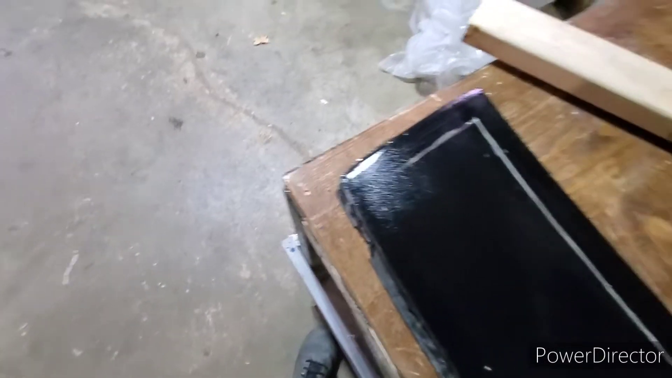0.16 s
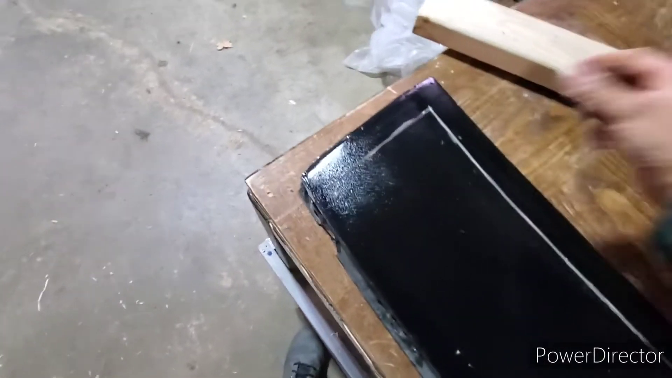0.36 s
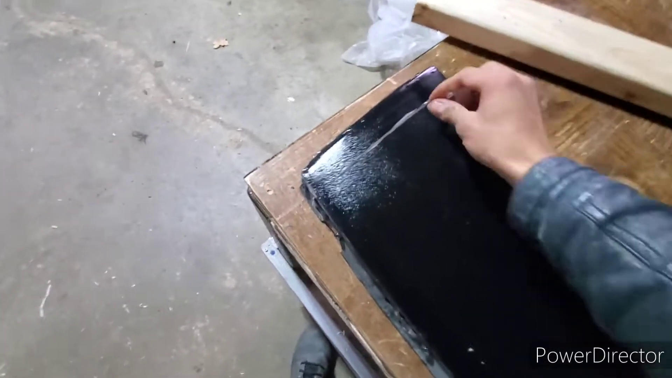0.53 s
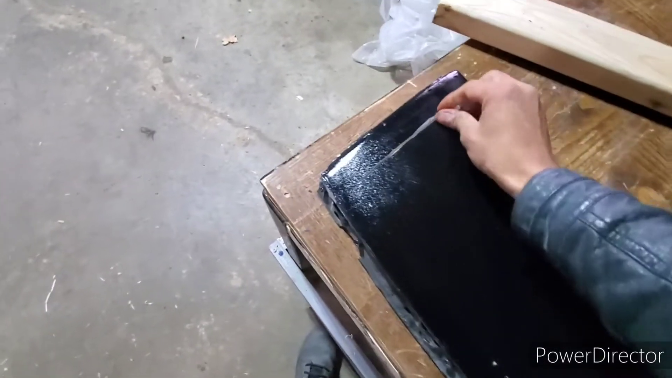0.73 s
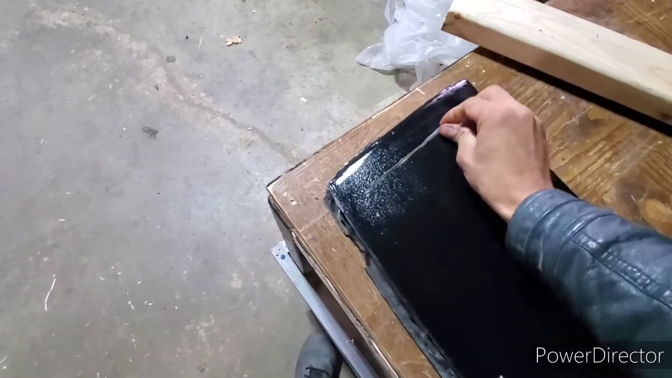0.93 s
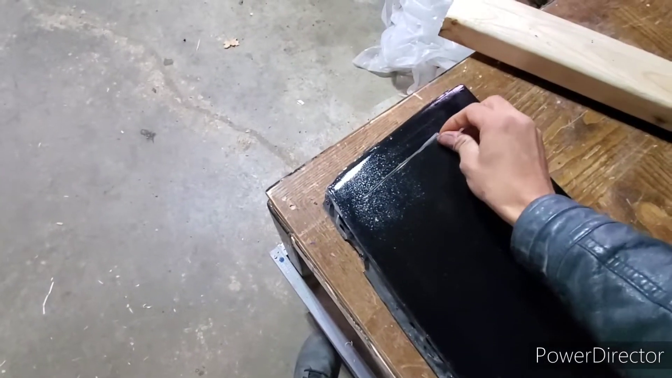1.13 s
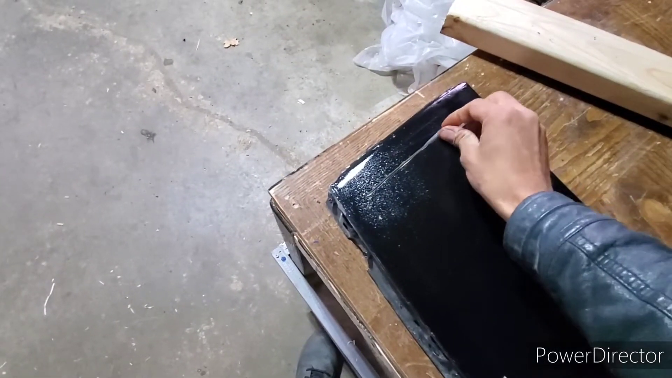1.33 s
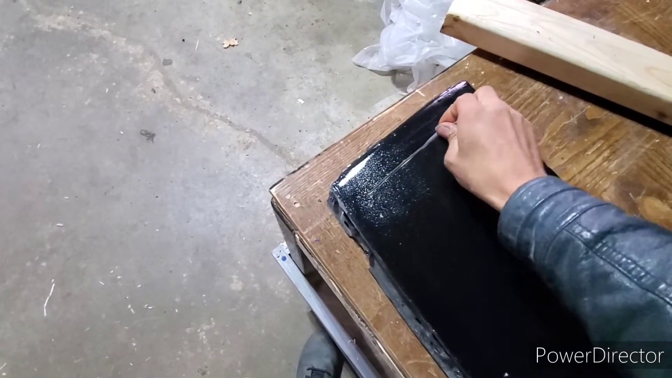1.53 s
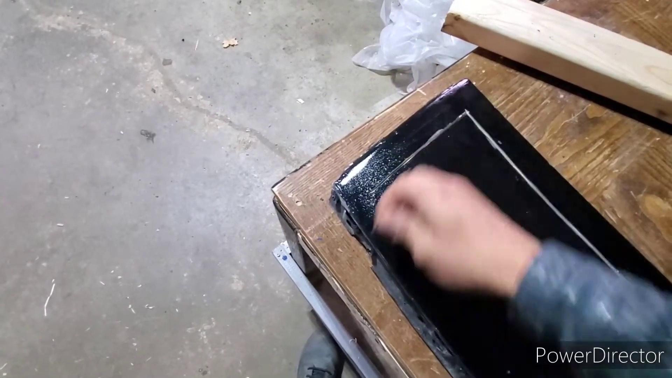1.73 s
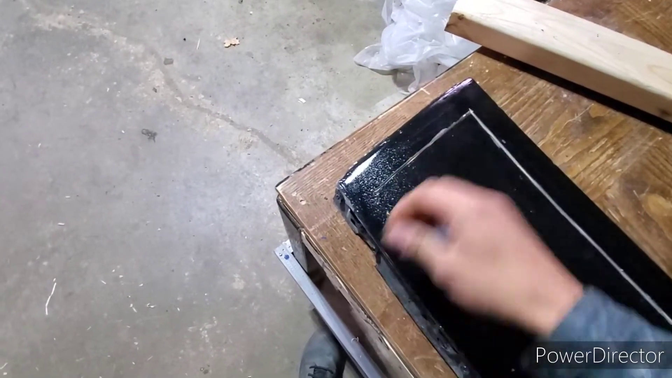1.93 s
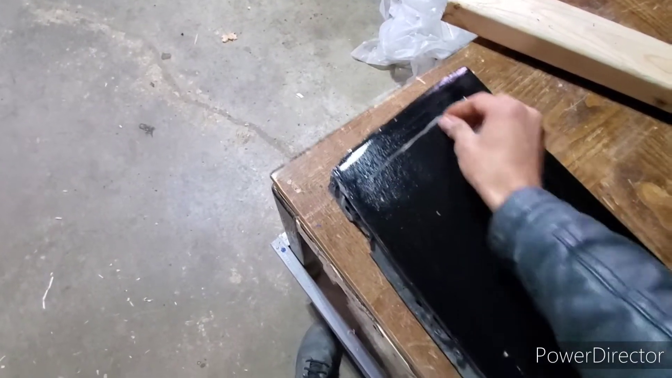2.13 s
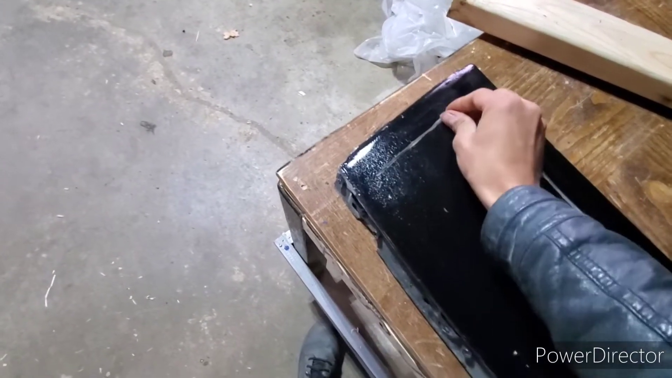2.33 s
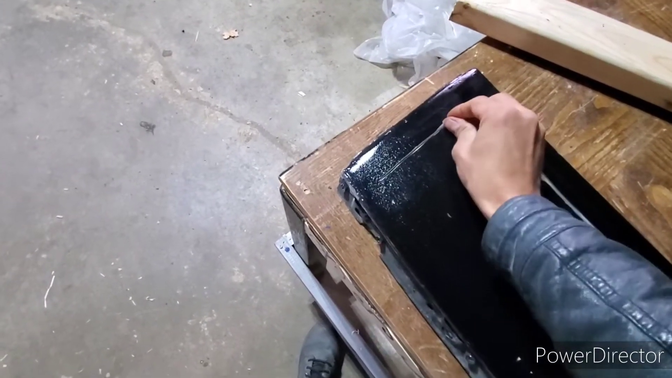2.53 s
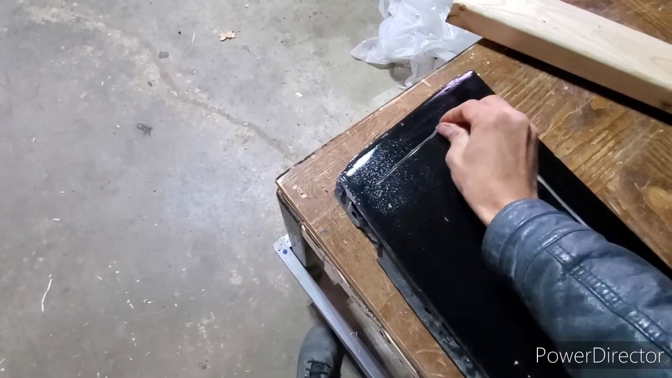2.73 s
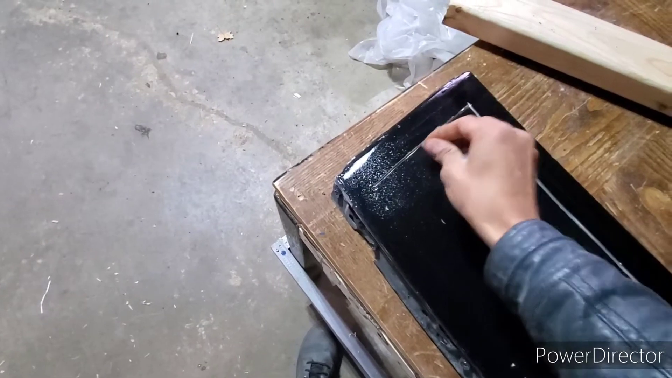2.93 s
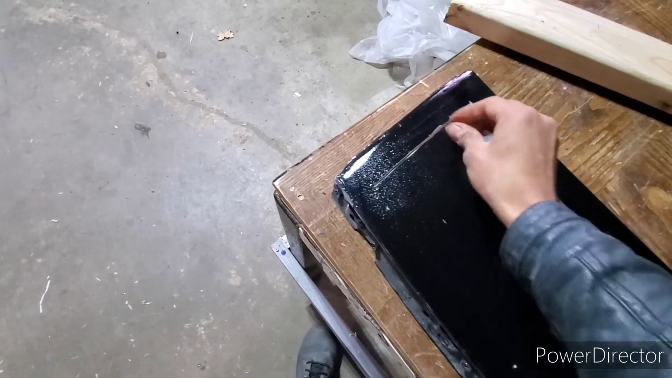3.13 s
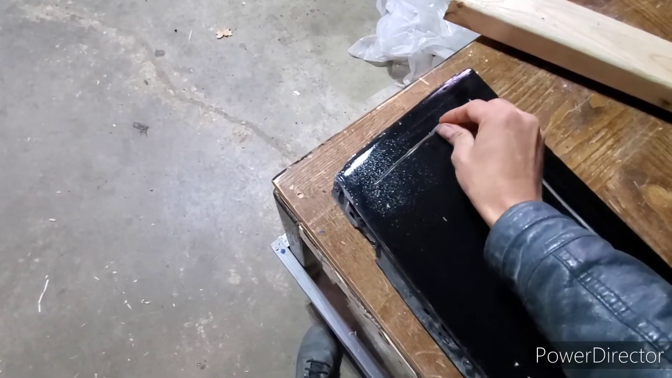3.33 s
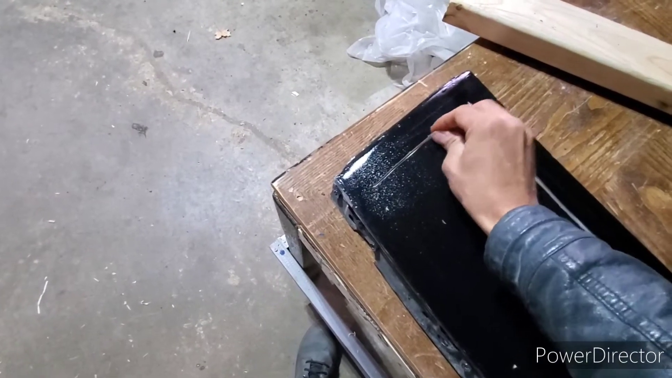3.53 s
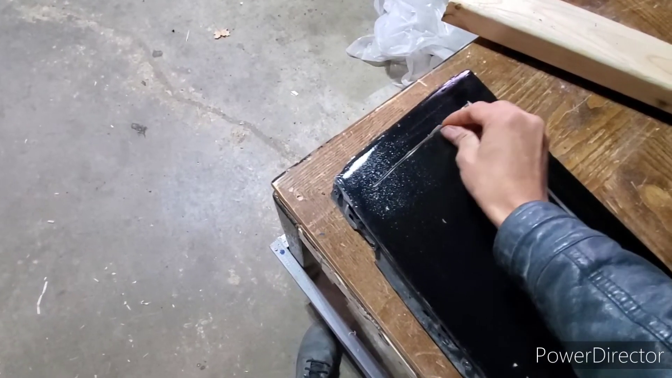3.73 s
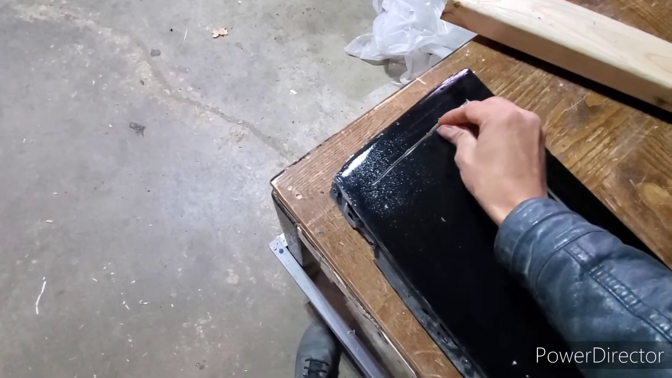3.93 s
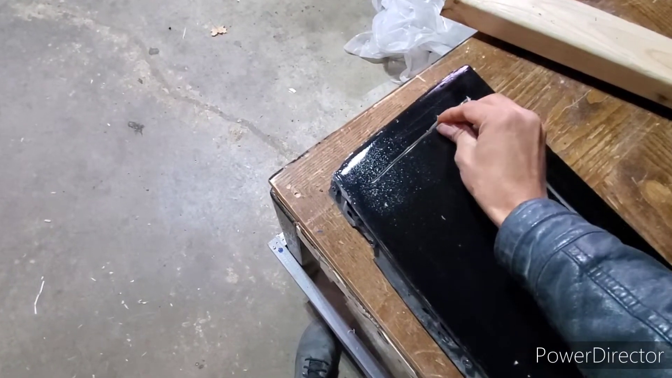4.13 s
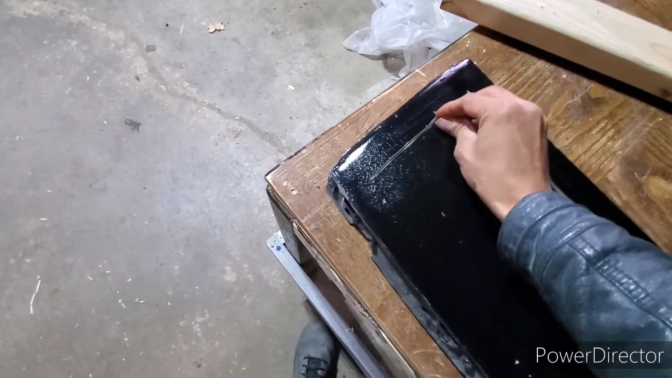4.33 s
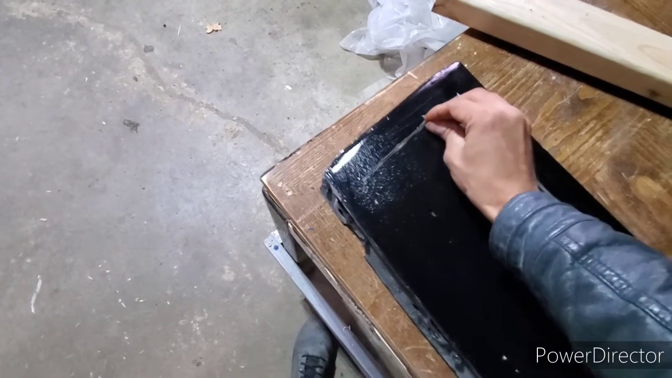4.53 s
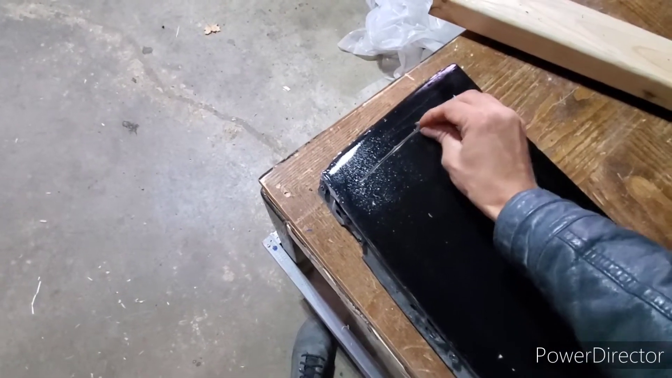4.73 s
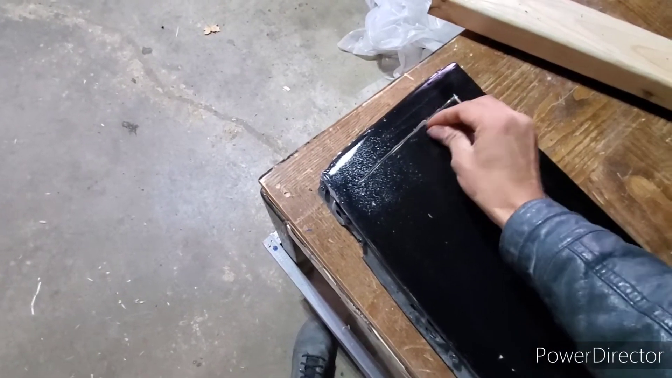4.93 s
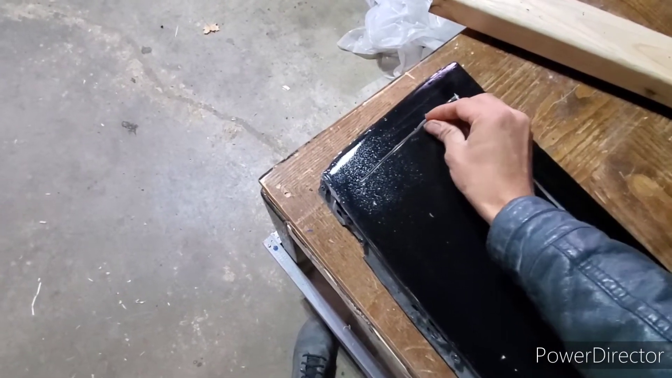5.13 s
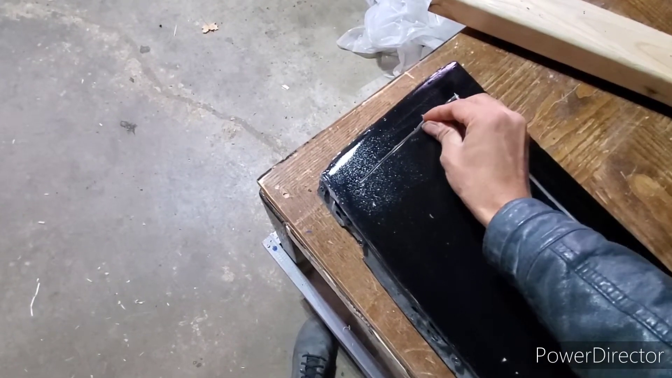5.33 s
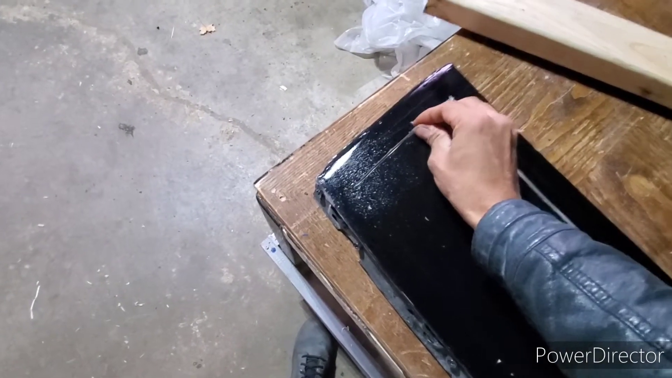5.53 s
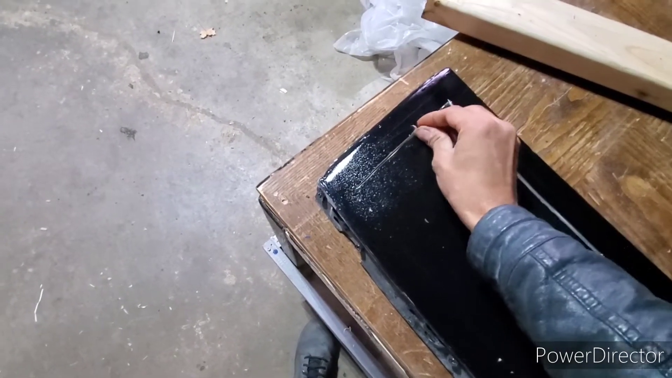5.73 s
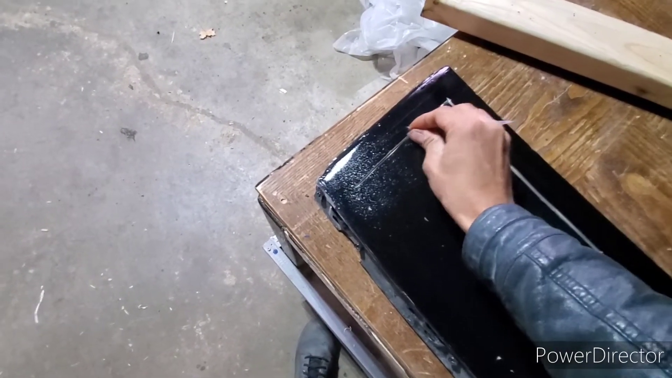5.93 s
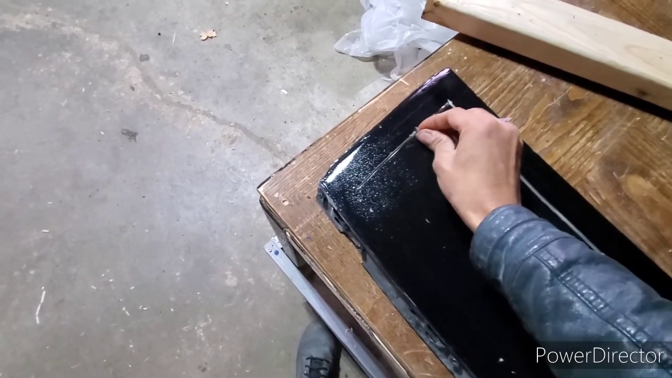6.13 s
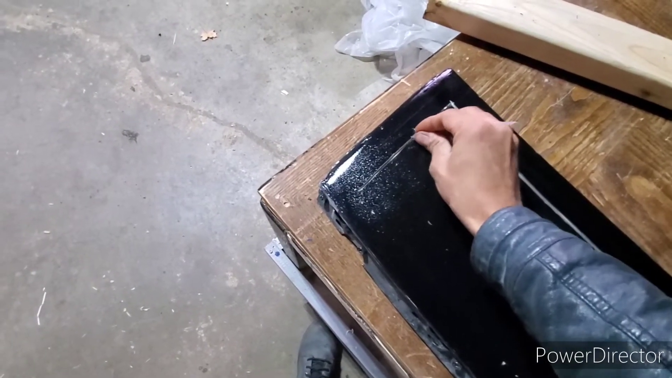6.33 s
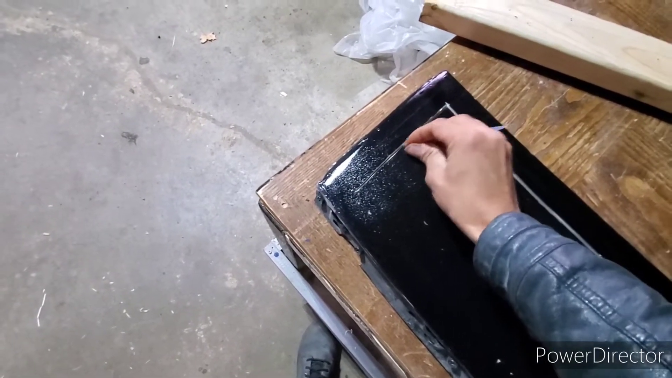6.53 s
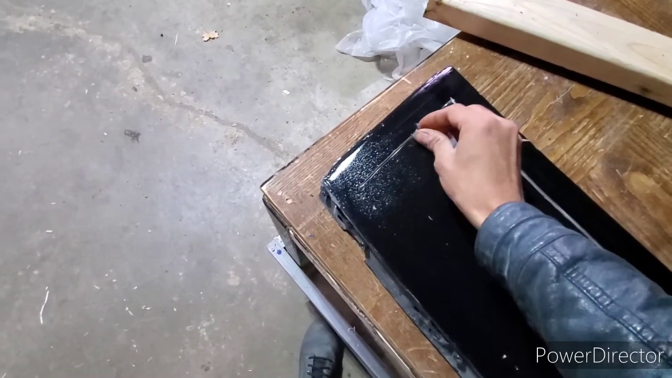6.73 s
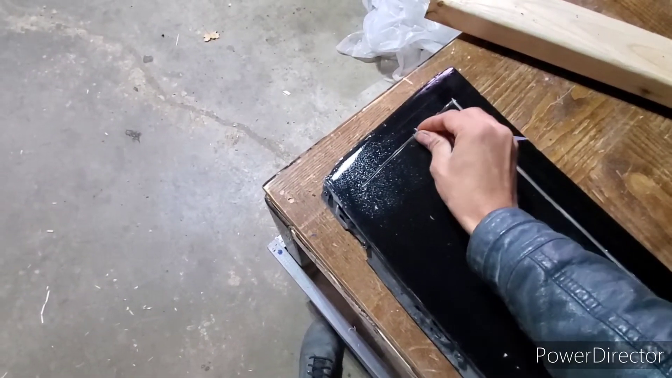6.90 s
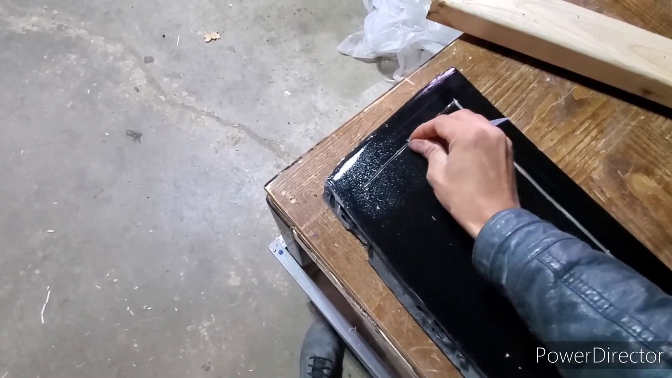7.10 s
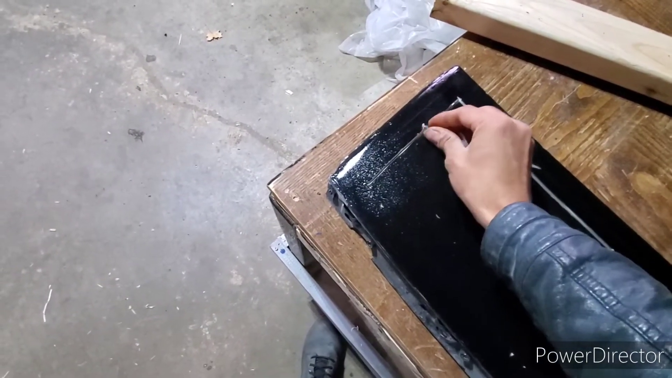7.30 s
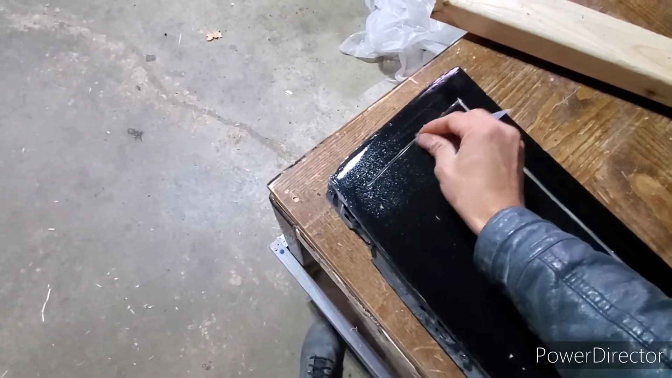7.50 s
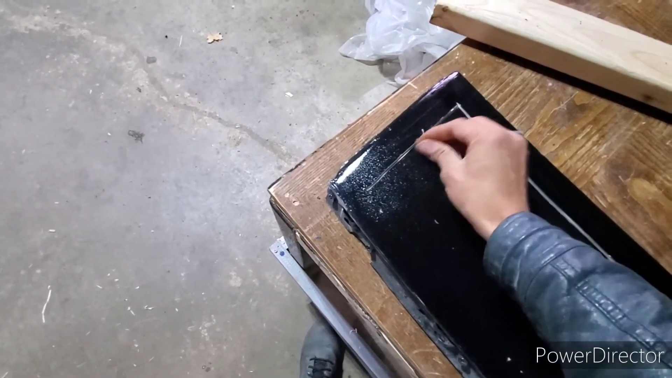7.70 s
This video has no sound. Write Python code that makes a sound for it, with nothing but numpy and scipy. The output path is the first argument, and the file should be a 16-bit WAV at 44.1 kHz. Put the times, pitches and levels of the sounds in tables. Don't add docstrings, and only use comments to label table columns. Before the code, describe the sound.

Fingernails knock and scrape on a hollow plastic panel while stuck tape lets go in sharp ticks, cracks and short crackling rips, inside a bare garage.

```python
import sys
import numpy as np
from scipy import signal
from scipy.fft import rfft, irfft
from scipy.io import wavfile
from scipy.ndimage import uniform_filter1d

SR = 44100
rng = np.random.default_rng(int(sys.argv[2]) if len(sys.argv) > 2 else 0)


def ratio_of_db(decibels):
    return 10 ** (np.asarray(decibels, float) / 20)


def transcribe(u):
    v = np.clip(np.atleast_2d(u).T, -1, 1)
    q = np.round(v * 32767).astype(np.int16)
    wavfile.write(sys.argv[1], SR, q)


N = 342216
T = np.arange(N) / SR
SIDES = np.array([[1], [-1]])


def unit(x):
    return x / np.sqrt(np.mean(x ** 2))


def even(x, span_s):
    return x / np.sqrt(uniform_filter1d(x ** 2, int(span_s * SR)) + 1e-12)


def band(x, lo_hz, hi_hz):
    sos = signal.butter(2, [lo_hz, min(hi_hz, .45 * SR)], "band", fs=SR, output="sos")
    return signal.sosfilt(sos, x)


def decay(t, t60_s):
    return np.exp(-np.log(1000) * t / t60_s)


def on_log(hz, table, column):
    rows = np.array(table)
    return np.interp(np.log(np.maximum(hz, 1)), np.log(rows[:, 0]), rows[:, column])


def over_time(table):
    return np.interp(T, *np.transpose(table))


def add(out, s, y):
    i = int(s * SR)
    out[..., i:i + y.shape[-1]] += y[..., :N - i]


def pair(count, like):
    mid, side = rng.standard_normal((2, count))
    return np.sqrt(like) * mid + np.sqrt(1 - like) * side * SIDES


def pan(db):
    return ratio_of_db(SIDES / 2 * db)


def slips(per_s, spread_db):
    when = rng.random(N) < per_s / SR
    size = ratio_of_db(spread_db * rng.exponential(size=N))
    return unit(when * size * rng.choice([-1, 1], N))


def ring(modes, detune, scatter_db, spot_hz=0, fall_db=0):
    hz, db, t60_s = np.transpose(modes)[:, :, None]
    luck = rng.standard_normal((3, len(modes), 1))
    t = T[:SR // 4]
    if spot_hz:
        db = db - fall_db * np.abs(np.log2(hz / spot_hz))
    turns = hz * (1 + detune * luck[1]) * t + 0.16 * luck[2]
    level = ratio_of_db(db + scatter_db * luck[0])
    y = np.sum(level * decay(t, t60_s) * np.sin(2 * np.pi * turns), axis=0)
    y = y * (1 - np.exp(-t * hz.mean() / 0.094)) ** 2
    return y / np.abs(y).max()


# frequency in Hz, density in dB per Hz.
AIR = [(18, -33), (30, -19), (95, 2), (239, 13), (461, -7), (844, -41), (1160, -22), (2120, -15),
       (3770, -1.5), (5900, -46), (7670, -19), (14800, -49), (16000, -48.5)]
AIR_DB = -33.5
# time in seconds, level in dB.
GRIP = [(0.0, -46), (1.55, -36), (1.69, -28.5), (2.14, -36), (2.4, -29.5), (2.59, -37.5), (3.05, -33.5),
        (3.5, -39), (3.95, -27.5), (4.08, -40), (5.25, -36), (5.79, -39.5), (6.29, -33.5), (6.46, -40),
        (6.74, -38), (7.02, -40), (7.76, -34.5)]


def air():
    hz = np.fft.rfftfreq(N, 1 / SR)
    wide = np.clip(hz / 670, .2, 1)
    mid, side = rfft(rng.standard_normal((2, N)))
    colour = ratio_of_db(on_log(hz, AIR, 1) - on_log(hz, PORTS, 1))
    tone = unit(irfft(colour * (hz > 70) * (mid + wide * side * SIDES), N))
    mid, side = band(rng.standard_normal((2, N)), 45, 91.6)
    rumble = unit(mid + 0.19 * side * SIDES)
    return ratio_of_db(AIR_DB) * tone + ratio_of_db(over_time(GRIP)) * rumble


# centre in Hz, t60 in seconds, level in dB, likeness left to right 0..1.
GARAGE = [(144.6, 0.59, -28, 0.94), (298, 0.84, -43.5, 0.93), (646, 0.43, -39.5, 0.87),
          (1112, 0.62, -39, 0.061), (2050, 0.66, -44, 0.18), (3400, 0.56, -42.5, 0.049),
          (6000, 0.062, -30, 0.04), (11700, 0.34, -35.5, 0.05)]


def garage(x):
    t = T[:SR]
    tail = 0
    for hz, t60_s, db, like in GARAGE:
        mid, side = (band(rng.standard_normal(SR), hz / 1.79, hz * 1.358) for _ in range(2))
        ears = np.sqrt((1 + like) / 2) * mid + np.sqrt((1 - like) / 2) * side * SIDES
        tail = tail + ratio_of_db(db) * ears * decay(t, t60_s)
    tail = tail * np.clip((t - .004) / 0.0013, 0, 1)
    return signal.fftconvolve(x[None], tail, axes=1)[:, :N]


# time in seconds, rustle in dB.
RUSTLE = [(0.0, -53.5), (0.26, -71.5), (1.62, -62), (1.83, -55), (2.07, -59.5), (2.36, -57.5), (3.41, -62),
          (3.74, -54), (4.13, -68), (4.45, -70.5), (5.06, -56.5), (5.25, -63.5), (6.35, -62.5),
          (6.46, -52.5), (6.94, -68.5), (7.13, -57), (7.76, -51)]
RUSTLE_FIZZ_DB = -4.5
# start in seconds, length in ms, crackle in dB, fizz in dB relative.
TUGS = [(0, 87, -53, 8), (.22, 180, -71, 12), (.52, 90, -70, 13.5), (1.27, 40, -63.5, -3),
        (3.0, 28, -58, -7), (5.86, 88, -69, -14), (.79, 114, -57.5, 3), (1.091, 130, -63.5, 0),
        (1.561, 39, -54.5, -1), (1.669, 37, -54, 2), (1.706, 62, -44.5, 6), (1.885, 85, -47.5, 3),
        (2.194, 96, -48.5, 2.5), (2.42, 97, -71, 10), (2.56, 86, -54, -3), (2.563, 8.1, -29.5, 4),
        (6.775, 35, -62, -12), (2.825, 126, -46, -4), (3.167, 14, -46.5, -1), (3.553, 102, -40.5, 2),
        (3.769, 50, -50, -2), (3.855, 22, -51, 6), (4.0, 75, -52, 2), (4.355, 180, -57, -8),
        (4.823, 160, -49, -4.5), (5.445, 89, -49, 5), (5.929, 75, -37, 3.5), (6.26, 87, -61, -5),
        (6.465, 134, -49, -14), (7.11, 95, -53.5, -8), (7.366, 100, -61, 7), (7.57, 106, -46.5, -11)]
TAPE_HZ, FIZZ_DB_PER_OCTAVE = 4130, 34
# start in seconds, length in ms, level in dB, low edge in Hz, high edge in Hz.
SQUEAL = (1.712, 46, -38, 3453, 4202)


def peel():
    snap_tail = np.exp(-1 / (0.0023 * SR))
    snaps = even(signal.lfilter([1], [1, -snap_tail], np.abs(slips(330, 1.2))), 0.032)
    crackle = pair(N, 0.53)
    fizz = unit(band(pair(N, 0.53), 9200, 16700))
    drift = uniform_filter1d(rng.standard_normal((2, N)), int(.05 * SR))
    flicker = ratio_of_db(1.8 * unit(drift))
    rustle = flicker[0] * unit(band(crackle, 1590, 8200))
    rustle = rustle + flicker[1] * ratio_of_db(RUSTLE_FIZZ_DB) * fizz
    out = ratio_of_db(over_time(RUSTLE)) * rustle
    for s, ms, db, fizz_db in TUGS:
        hz = TAPE_HZ * 2 ** (fizz_db / FIZZ_DB_PER_OCTAVE)
        span = slice(int(s * SR), int((s + ms / 1000) * SR))
        tape = unit(band(crackle[:, span], hz / 1.6, hz * 1.11))
        tape = tape + 3.7 * unit(band(crackle[:, span], 850, 5800))
        pull = signal.windows.tukey(tape.shape[1], .4) * (0.35 + 0.8 * snaps[span])
        add(out, s, ratio_of_db(db) * pull * (unit(tape) + ratio_of_db(fizz_db) * fizz[:, span]))
    s, ms, db, lo_hz, hi_hz = SQUEAL
    squeal = unit(band(crackle[:, :int(ms / 1000 * SR)], lo_hz, hi_hz))
    add(out, s, ratio_of_db(db) * signal.windows.tukey(squeal.shape[1], .5) * squeal)
    return out


# start in seconds, peak in dB, snap in Hz, left minus right in dB.
STRANDS = [(0.0024, -24.5, 4130, -18), (0.824, -37, 3850, -3), (1.5664, -37, 2460, 4),
           (1.707, -26.5, 3630, 11), (1.918, -22, 6000, -2), (1.936, -20, 6540, 8), (1.947, -21.5, 6400, 7),
           (2.1141, -37.5, 3400, -16.5), (2.4653, -39, 4700, 22), (2.5027, -33.5, 4030, 19),
           (3.1728, -43.5, 2340, 33), (3.5755, -25.5, 4660, 11), (3.6099, -17, 6540, 4),
           (3.6302, -21.5, 5260, -21), (4.6932, -48, 2550, 43), (5.4458, -22, 5800, -8),
           (5.4926, -26.5, 5730, 23.5), (6.325, -36.5, 5730, 1), (6.8515, -39.5, 3730, 13),
           (7.0493, -43, 3870, 4)]
# start in seconds, peak in dB, snap in Hz, left minus right in dB.
POPS = [(0.0586, -29, 4380, -6), (1.75, -14.5, 3480, -3), (2.9204, -40, 2460, -24),
        (3.5912, -26, 3120, -11), (3.7914, -33.5, 4500, 16), (3.8672, -19.5, 5860, 8),
        (4.0098, -26.5, 4400, -0.5), (4.7218, -26.5, 3370, 5), (5.4255, -49, 5500, 10),
        (5.9697, -7.5, 6400, -4.5), (6.2941, -32, 5770, 5), (6.39, -34, 3000, 8), (6.461, -13, 3320, 7.5),
        (6.761, -31.5, 2050, 3), (7.5068, -34, 2270, 9), (7.5696, -10.5, 2970, 0.5)]
# start in seconds, peak in dB, snap in Hz, left minus right in dB.
PICKS = [(0.702, -31, 2560, -1), (2.2009, -24.5, 2730, 0), (2.8125, -35, 3000, -2),
         (2.8272, -21.5, 3030, 5), (2.8477, -26, 3140, -13), (3.2375, -40, 3030, 6),
         (4.4684, -16, 4400, 3.5), (4.8251, -11, 2780, -0.5), (5.472, -9, 6000, -3.5),
         (5.6168, -22, 2600, -2), (6.2665, -29.5, 3970, 9), (7.4065, -15.5, 2230, -2),
         (7.528, -24, 2600, 0)]
STRAND_FIZZ_DB, POP_FIZZ_DB, PICK_FIZZ_DB = 1.5, -11.5, -32.5


def ticks():
    out, t = np.zeros((2, N)), T[:1024]
    shape = (1 - np.exp(-t / 0.0008)) * (np.exp(-t / 0.00017) + 0.049 * np.exp(-t / 0.0037))
    for rows, fizz_db in (STRANDS, STRAND_FIZZ_DB), (POPS, POP_FIZZ_DB), (PICKS, PICK_FIZZ_DB):
        for s, db, hz, pan_db in rows:
            snap = unit(band(shape * pair(len(t), 0.77), hz / 1.395, hz * 1.283))
            snap = snap + 0.36 * unit(band(shape * pair(len(t), 0.45), 1200, 12500))
            snap = snap / np.abs(snap).max() * pan(pan_db - 2.5)
            fizz = band(shape * pair(len(t), 0.49), 5300, 17600)
            fizz = fizz / np.abs(fizz).max()
            add(out, s, ratio_of_db(db) * (snap + ratio_of_db(fizz_db + 11) * fizz))
    return out


# start in seconds, peak in dB, pitch in Hz, fizz in dB relative, left minus right in dB.
CRACKS = [(0.0428, -28, 4200, 6.5, 3.5), (0.2169, -41, 3350, -13, 11), (0.2564, -47, 3320, -1, -3),
          (0.4237, -42, 3430, 1, 8), (0.4344, -30, 5700, -4, 14), (0.9939, -38, 3300, -33, 17),
          (1.0458, -34, 4020, -11, 11), (1.1004, -30, 2500, -14, 5), (1.4925, -35.5, 4600, -7, 8.5),
          (1.8921, -20, 5130, 3, 13), (2.3694, -41, 3120, -9, 12), (2.394, -38, 3560, -8, 1),
          (2.4303, -36, 3070, -4, 9.0), (2.4526, -34, 4590, -9, 4), (3.3379, -34, 3900, -10, 11.5),
          (3.4536, -27, 3780, -10, 2), (3.5479, -22.5, 3200, -27, 8.5), (4.3354, -49, 4550, -21, 16.5),
          (4.343, -35, 4310, -15, -2), (4.3512, -16, 4230, -26, 15.5), (4.4284, -41, 3770, -27, 17),
          (4.436, -31, 3350, -19, 11), (4.4458, -24.5, 3680, -27, 13.5), (5.0423, -13, 5180, -11, 7.5),
          (5.23, -18.5, 5800, -14, 8.5), (5.4245, -29, 6420, -23, 11), (5.576, -23, 3400, -31, 4),
          (5.7308, -26.5, 5970, -1, 11), (5.872, -42, 3120, -19, 11), (5.905, -48, 2930, -10, 16),
          (5.9419, -18, 4780, -20, 7), (5.9648, -16, 6400, 1, 12), (6.275, -34, 6100, -19, 6),
          (7.2173, -34, 3720, -15, 3), (7.3703, -42, 3110, -3, 5), (7.379, -40, 6200, -2, 6),
          (7.392, -31, 2720, -3, 6), (7.4067, -16, 6400, -1.5, 12), (7.4483, -15, 4250, -13, 4.5),
          (7.7247, -33, 2920, -13, 5)]
CRACK_S, CRACK_TAIL_S, CRACK_TAIL_DB = 0.00034, 0.0025, -15


def cracks():
    out, t = np.zeros((2, N)), T[:1024]
    burst = np.exp(-(t / CRACK_S - 2) ** 2)
    tail = ratio_of_db(CRACK_TAIL_DB) * (1 - np.exp(-t / CRACK_S)) * np.exp(-t / CRACK_TAIL_S)
    for s, db, hz, fizz_db, pan_db in CRACKS:
        wide = unit(band(pair(len(t), 0.51), hz / 2.36, 8040))
        tone = np.sin(2 * np.pi * (hz * t + rng.random()))
        snap = burst * (tone + .3 * wide) + tail * wide
        fizz = (burst + tail) * unit(band(pair(len(t), .45), 8700, 17000))
        crack = snap * pan(pan_db - 6) + ratio_of_db(fizz_db + 3.5) * fizz
        add(out, s - CRACK_S, ratio_of_db(db - 0.5) * crack)
    return out


# frequency in Hz, level in dB, t60 in seconds.
CLACK = [(903, -11.5, 0.15), (1127.6, 6.5, 0.037), (1170, -1.5, 0.037), (1362, -4.5, 0.067),
         (1504, 17.5, 0.0076), (1687, 3, 0.03), (1945, 4.5, 0.017), (2275, 2.5, 0.014)]
# start in seconds, peak in dB, pitch in Hz.
CATCHES = [(1.074, -29, 1170), (1.1164, -28, 1130), (1.1355, -37, 1160), (1.3374, -50, 1250),
           (1.358, -30.5, 1140), (1.5259, -52, 2140), (1.5379, -34, 2040), (1.5648, -42, 2130),
           (2.6125, -29, 1180), (2.7327, -35, 1390), (2.794, -17, 1170), (3.5592, -21, 1340),
           (3.6296, -29, 1600), (4.467, -14, 1140), (4.6939, -21, 1100), (5.617, -22, 1140),
           (5.872, -23.5, 1160), (5.927, -32, 1090), (5.9858, -7.5, 1430), (6.0056, -32, 1140),
           (6.0398, -28, 1150), (6.0714, -32, 1590), (6.0906, -25, 1190), (7.1314, -28, 1360),
           (7.57, -12, 1160)]
CATCH_RISE_S, CATCH_T60_S = .0012, .09


def catches():
    out, t = np.zeros(N), T[:SR // 4]
    touch = (1 - np.exp(-t / CATCH_RISE_S)) ** 2 * decay(t, CATCH_T60_S)
    for s, db, hz in CATCHES:
        add(out, s, ratio_of_db(db - 1) * touch * ring(CLACK, 0.037, 2.5, spot_hz=hz, fall_db=26))
    return out


# frequency in Hz, level in dB, t60 in seconds.
BOOM = [(114, -5, .13), (165, -4, .11), (183, -1, .11), (220, -5, .09), (287, 1, .1)]
# frequency in Hz, level in dB, t60 in seconds.
DRUM = [(306, 1, 0.096), (371.8, -2, 0.093), (407.3, -8, 0.11), (443, 4.5, 0.054), (503.3, 9.5, 0.029),
        (558, -11, 0.062), (653.5, 3.5, 0.059), (728, -20.5, 0.62)]
# firmest touch in seconds, drum in dB, clack in dB relative,
# landing in seconds, lifting in seconds.
STROKES = [(0.005, -38, -5, 0.013, 0.16), (0.831, -29, -14, 0.05, 0.11), (1.125, -30.5, -14, 0.17, 0.079),
           (1.368, -33, -11.5, 0.14, 0.015), (2.946, -21, -23, 0.36, 0.029), (3.599, -27, -20, 0.091, 0.43),
           (5.438, -36, -13, 0.056, 0.82), (5.881, -31, -7.5, 0.018, 0.46), (6.002, -23.5, -42, 0.2, 0.16),
           (6.869, -39.5, -2, 0.14, 0.019), (7.185, -12, -21, 0.084, 0.056)]
# firmest touch in seconds, drum in dB,
# clack in dB relative, landing in seconds, lifting in seconds.
EDGE_STROKES = [
    (2.86, -32.5, 1, 0.22, 0.11),
    (4.864, -17, -13, 0.078, 0.093),
    (6.52, -13.5, -23, 0.12, 0.067),
    (7.635, -11.5, -23, 0.12, 0.09),
]
EDGE_HZ, STROKE_BOOM_DB = 660, -16.5
LIGHT_DB, CLACK_STAYS = 34, 0.34


def drag():
    def rub(clicks, response, span_s):
        return even(signal.fftconvolve(clicks, response)[:N], span_s)

    rattle = slips(400, 0.52)
    drum = rub(rattle, ring(DRUM, 0, 0), 0.12)
    clack = rub(slips(160, 2.5), ring(CLACK, 0, 0, spot_hz=1220, fall_db=10.5), 0.041)
    boom = rub(slips(370, 0.6), ring(BOOM, 0, 0, spot_hz=183, fall_db=9), 0.13)
    edge = rub(rattle, ring(DRUM, 0, 0, spot_hz=EDGE_HZ, fall_db=21), 0.051)
    out = np.zeros(N)
    for strokes, lid in (STROKES, drum), (EDGE_STROKES, edge):
        lid = lid + ratio_of_db(STROKE_BOOM_DB) * boom
        for firm_s, drum_db, clack_db, landing_s, lifting_s in strokes:
            start_s, end_s = firm_s - landing_s, firm_s + lifting_s
            fade_db = np.interp(T, [start_s, firm_s, end_s], [LIGHT_DB, 0, LIGHT_DB])
            touch = np.clip(np.minimum(T - start_s, end_s - T) / 0.0042, 0, 1)
            grains = ratio_of_db(clack_db + CLACK_STAYS * fade_db) * clack
            out += touch * ratio_of_db(drum_db - 11 - fade_db) * (lid + grains)
    return out


# start in seconds, peak in dB, clack in dB relative, contact in ms.
MIDDLE_BLOWS = [(0.841, -21.5, -14, 29), (1.138, -33.5, -7, 30), (1.368, -19, -21.5, 34),
                (2.308, -16.5, -9.5, 15), (2.35, -14.5, -20, 20), (2.811, -42, 9, 6.3),
                (2.824, -32.5, 11.5, 25), (3.389, -21, -19.5, 47), (3.8, -13.5, -9.5, 15),
                (3.876, -22.5, -26, 45), (4.467, -29.5, 2, 7.7), (5.19, -14, -10.5, 38),
                (6.222, -18, -14, 30), (6.677, -22.5, -19, 13)]
# start in seconds, peak in dB, clack in dB relative, contact in ms.
RIM_BLOWS = [(0.702, -38, 4, 25), (1.046, -51, 5, 10), (1.7, -12.5, -5.5, 18), (2.202, -25, -8, 35),
             (2.611, -41, 6, 31), (2.704, -35.5, 1.5, 43), (2.766, -34, 4, 7.3), (2.785, -29.5, -25, 27),
             (2.846, -24, 5.5, 14), (2.98, -10.5, -7.5, 4.2), (3.462, -45.5, 8, 17), (3.558, -40, 7, 23),
             (4.695, -23.5, -4.5, 33), (4.72, -28, 1, 14), (4.823, -30, 8.5, 15), (4.962, -13, -10.5, 11),
             (5.615, -28.5, 2, 21), (5.661, -31.5, -4.5, 16), (5.864, -41, 1, 45), (6.389, -25, -2, 39),
             (6.46, -19, 6, 23.6), (7.114, -26.5, -12, 55), (7.509, -25, -2, 53), (7.527, -27.5, -8, 25),
             (7.568, -20.5, 2.5, 15)]
MIDDLE_HZ, MIDDLE_BOOM_DB = 348, -10
RIM_HZ, RIM_BOOM_DB = 476, -16
USUAL_BLOW_DB = -21
BOOM_LAG = 0.41
BOOM_SPOT = 2.92
HARD_DB_PER_OCTAVE = 40


def knocks():
    out, t = np.zeros(N), T[:SR // 4]
    spots = (MIDDLE_BLOWS, MIDDLE_HZ, MIDDLE_BOOM_DB), (RIM_BLOWS, RIM_HZ, RIM_BOOM_DB)
    for blows, spot_hz, spot_boom_db in spots:
        for s, db, clack_db, contact_ms in blows:
            harder_db = db - USUAL_BLOW_DB
            boom_db = spot_boom_db - BOOM_LAG * harder_db
            hz = spot_hz * 2 ** (np.clip(harder_db, -4, 9) / HARD_DB_PER_OCTAVE)
            hold_s = np.clip(contact_ms, 5, 40) / 1000
            rise = 1 - np.exp(-t / (0.08 * hold_s))
            finger = .28 + .72 / (1 + (t / hold_s) ** 4)
            lid = ring(DRUM, 0.018, 2.55, spot_hz=hz, fall_db=10.5)
            lid = lid + ratio_of_db(clack_db + 4.5) * ring(CLACK, .02, 2.5)
            boom = ring(BOOM, 0.013, 3.8, spot_hz=hz / BOOM_SPOT, fall_db=8)
            boom = ratio_of_db(boom_db + 4) * rise * boom
            add(out, s + 0.000887, ratio_of_db(db + 7) * rise * (finger * lid + boom))
    return out


def scene():
    near = peel() + ticks() + cracks() + catches() + drag() + knocks()
    return air() + garage(near.mean(axis=0)) + near


def top_cut(x):
    return signal.sosfilt(signal.butter(12, 16800, fs=SR, output="sos"), x)


# frequency in Hz, colour in dB, left minus right in dB.
PORTS = [(92.7, -8.5, -1.5), (365, 5.5, -0.5), (810, 1.5, 2.5), (1360, 4, 2.5), (3000, 0.5, 11),
         (6000, 1.5, 7.5), (6560, 3, -2.5), (7750, -11.5, 6.5), (9440, -5.5, 1.5), (11860, -1.5, 0.5),
         (15900, 2, 3.5), (16000, -28, -9), (16800, -70, 5)]
LEFT_LAG_S = 0.000096


def record(dry):
    hz = np.fft.rfftfreq(N, 1 / SR)
    ports = ratio_of_db(on_log(hz, PORTS, 1)) * pan(on_log(hz, PORTS, 2))
    lag = np.exp(-2j * np.pi * hz * LEFT_LAG_S * np.maximum(SIDES, 0))
    mix = irfft(rfft(dry) * ports * lag, N)
    return top_cut(mix)


dry = scene()
out = record(dry)
transcribe(out)
```